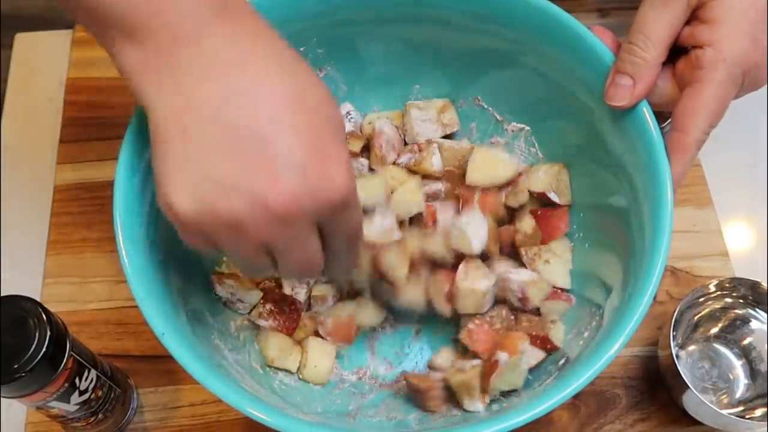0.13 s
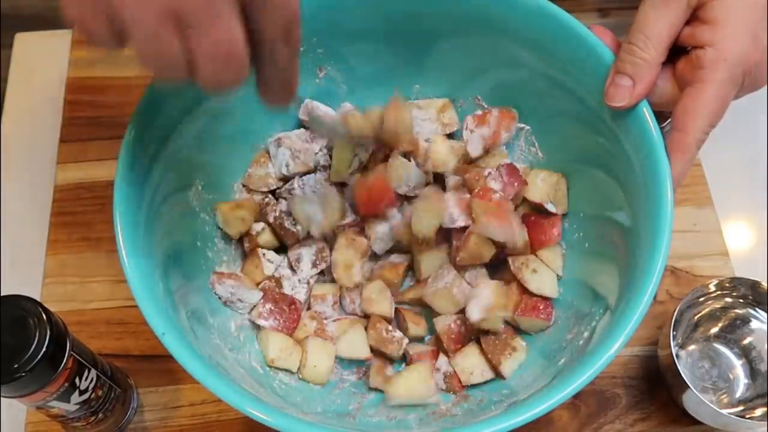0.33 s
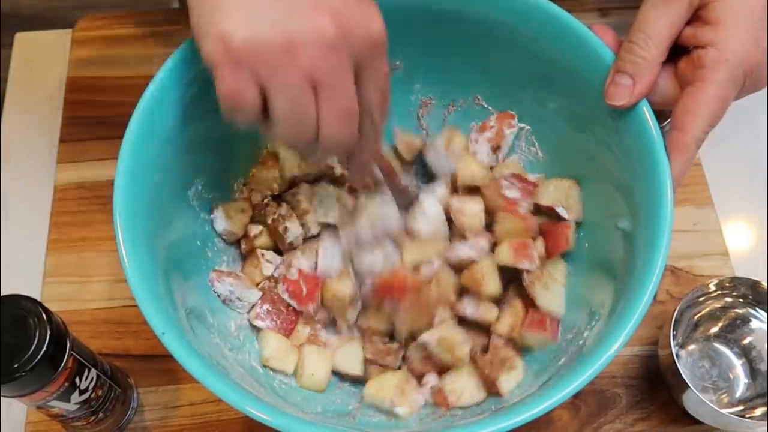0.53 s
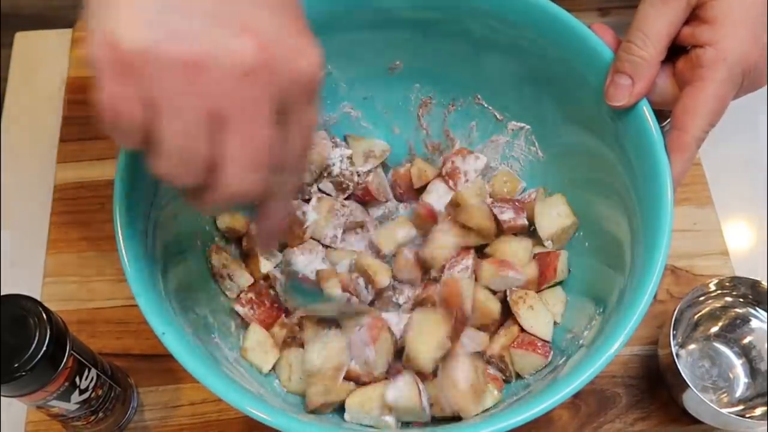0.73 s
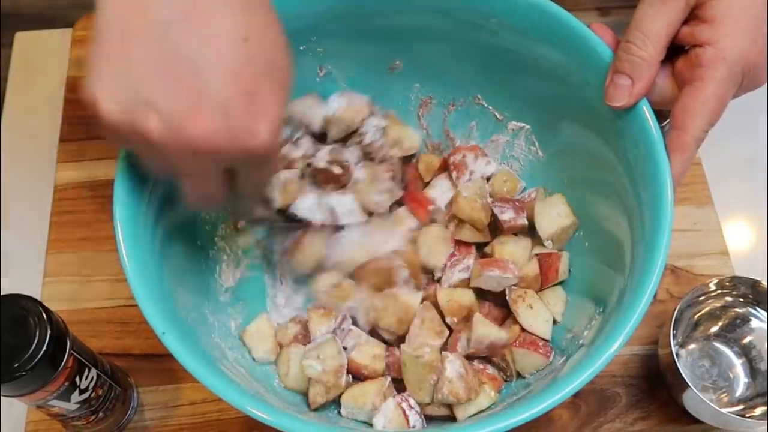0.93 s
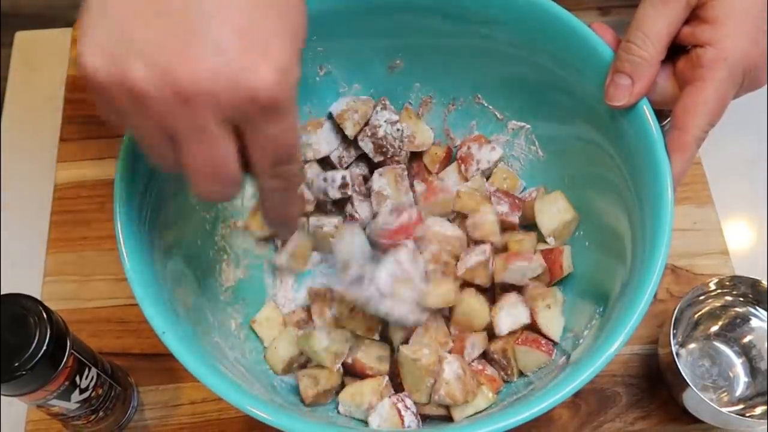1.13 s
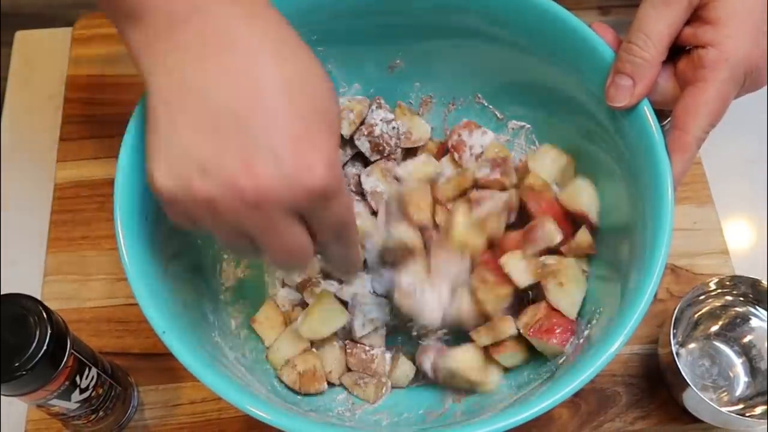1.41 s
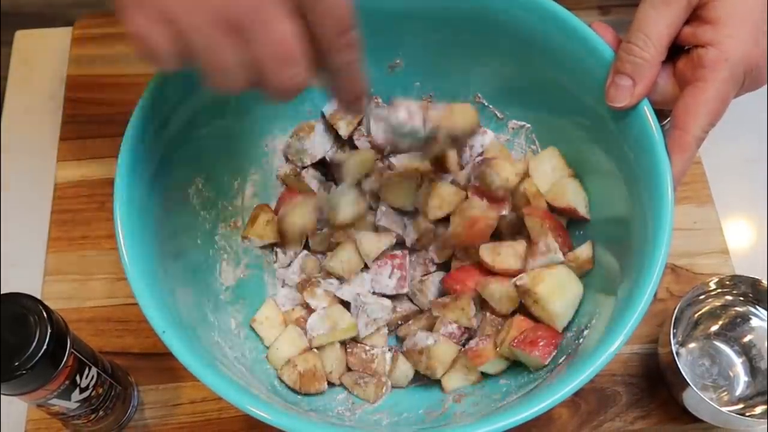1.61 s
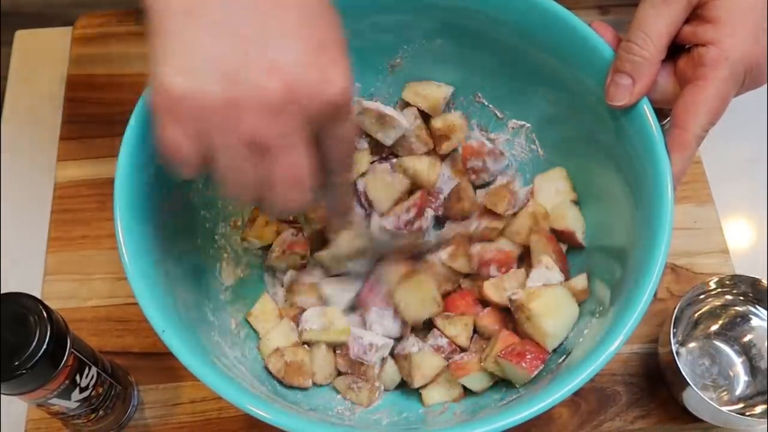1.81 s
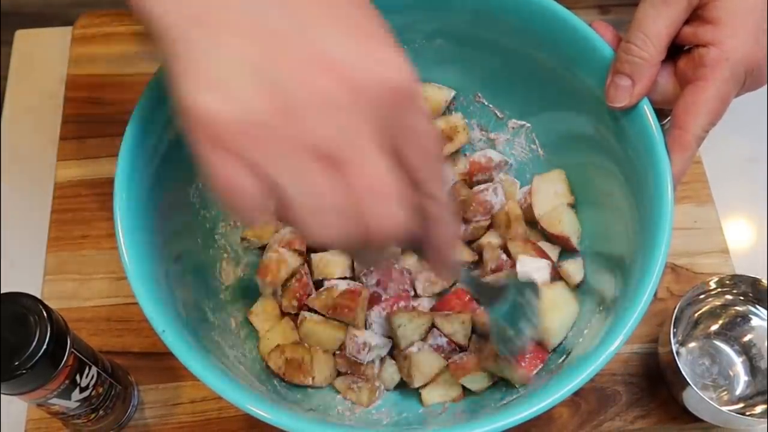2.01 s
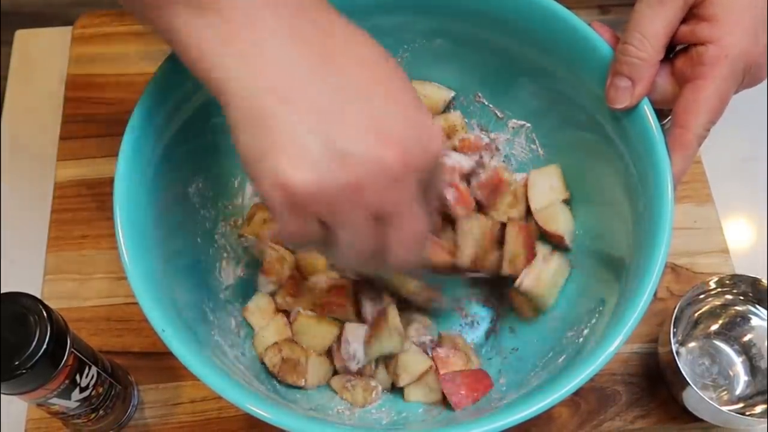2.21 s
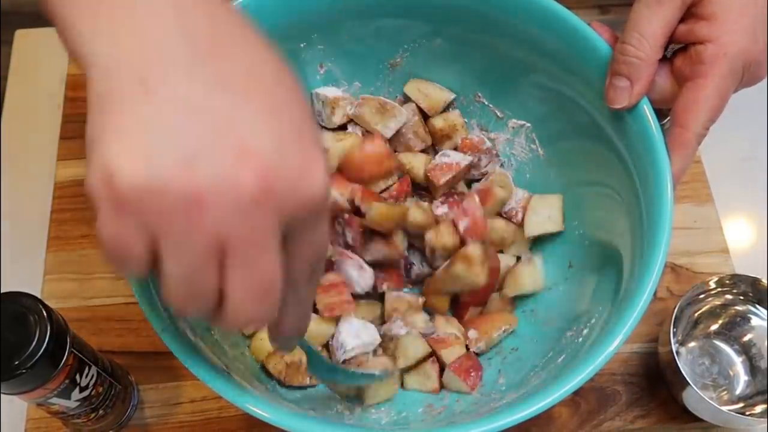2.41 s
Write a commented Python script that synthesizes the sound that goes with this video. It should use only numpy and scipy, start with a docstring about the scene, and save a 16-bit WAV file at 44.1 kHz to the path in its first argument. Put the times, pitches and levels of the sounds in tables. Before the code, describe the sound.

A spoon turns fruit chunks in a thick bowl, with sudden loud clacks and gritty scrapes

```python
"""In a hard kitchen, a metal spoon turns chopped fruit in a thick mixing bowl on a wooden counter.
Knocks ring the bowl's short modes behind a crack of noise; dropping fruit gives dull, swelling sine thuds.
The spoon edge drags through wet fruit: dense random clicks and hiss, partly ringing the bowl.
The room adds one clear echo and a noise tail over a quiet hum; whatever passes full scale is clipped."""
import sys
import numpy as np
from scipy import signal
from scipy.fft import rfft, irfft
from scipy.io import wavfile
from scipy.ndimage import uniform_filter1d

SR = 44100
rng = np.random.default_rng(int(sys.argv[2]) if len(sys.argv) > 2 else 0)


def dump_mix(stems):
    """Bounce the given channels to the path in sys.argv[1] as a 16-bit WAV at rate SR."""
    frames = np.atleast_2d(stems).T  # one column per channel
    limited = np.clip(frames, -1, 1)  # hard clip at full scale
    pcm = np.round(limited * 32767).astype(np.int16)
    wavfile.write(sys.argv[1], SR, pcm)


def volts(x):
    """Linear amplitude factor 10**(x/20) for a level x in dB, scalar or array-like."""
    e = np.asarray(x, float) / 20
    return 10 ** e


N = 112454  # length [samples]

# Ways the bowl rings: (pitch [Hz], relative level [dB], time to fall 60 dB when not held [s])
BOWL_MODES = [(491, -2, 0.019), (1040, 4, 0.013), (1300, -3.5, 0.02), (1790, -11.5, 0.067),
              (2235, -24.5, 0.079), (2591, -7.5, 0.03), (2934, -6.5, 0.029), (3290, -10, 0.056),
              (3660, -6, 0.055), (4017, 0.5, 0.011), (4155, -7, 0.021), (4562, -10.5, 0.031),
              (5630, -16, 0.018)]
# Spoon knocks: (time [s], level [dB], higher favoured pitch [Hz], lower favoured pitch [Hz],
# change of modes under SPLIT_HZ [dB], change of modes over UPPER_HZ [dB], crack against ring [dB])
KNOCKS = [(0.1279, -30, 3290, 1270, -5.5, -2, -16), (0.2118, 3, 3290, 2846, -6.5, -8, -33),
          (0.5518, -32, 3660, 1040, 1, -7, -23), (0.5716, -11.5, 1018, 530, -9.5, 3, -21),
          (1.055, -3.5, 2602, 1804, -5.5, -0.5, -19.5), (1.506, -31.5, 3465, 1430, -1, 7.5, -21.5),
          (1.759, -44, 2540, 515, -3.5, -11, -14), (1.9172, -41.5, 3340, 1790, -0.5, -7, -16),
          (2.066, -45, 1640, 1630, 2, -7, -43), (2.2106, -15, 2750, 1050, -16, 0.5, -0.5),
          (2.2275, -22, 2680, 4110, -17, -1.5, -16), (2.2912, -5.5, 2552, 509, -7, -7, -34)]
# Tone of the knock's crack and of the bright part of the drag: (frequency [Hz], gain [dB])
CRACK_TONE = [(2800, -26.5), (4500, 14), (7500, -1), (11000, -17), (16000, -32)]
# Dropping fruit pieces: (time [s], level before the bass cut [dB], pitch [Hz])
THUDS = [(0.054, -23.5, 562), (0.2595, -23, 956), (0.407, -21.5, 762), (0.86, -14.5, 784),
         (1.008, -32.5, 505), (1.081, -22, 830), (1.113, -32.5, 610), (1.302, -29, 640), (1.314, -27, 794),
         (1.378, -32, 541), (1.726, -30, 512), (1.836, -29.5, 532), (1.9165, -26.5, 586),
         (1.9335, -26.5, 540), (1.967, -33, 785), (2.172, -33.5, 554), (2.4655, -25.5, 562),
         (2.489, -30.5, 573)]
# Spoon dragging, joined by straight lines: (time [s], scrape level [dB], tumbling fruit level [dB])
DRAG = [(0, -51.5, -46.5), (.11, -53.5, -55), (.13, -44, -49.5), (.2, -48, -59), (.54, -66.5, -59.5),
        (.62, -48, -65), (.85, -57.5, -55.5), (1.03, -51.5, -55.5), (1.39, -58.5, -75), (1.42, -52.5, -58),
        (1.55, -49.5, -58.5), (1.68, -62, -57.5), (1.8, -66.5, -51), (1.84, -48, -46), (1.97, -50, -51.5),
        (2.155, -93, -58), (2.17, -47, -46), (2.208, -51.5, -45.5), (2.235, -37, -49),
        (2.285, -44.5, -51.5), (2.55, -53.5, -51)]
# Tone of the scrape: (frequency [Hz], relative level per Hz [dB])
SCRAPE_TONE = [(88, -33), (150, -4.5), (534, -6.5), (854, -13.5), (2100, -7.5), (2600, -3.5), (10200, -37),
               (12700, -33.5), (16000, -64.5)]
# Tone of the quiet kitchen: (frequency [Hz], relative level per Hz [dB])
HUSH_TONE = [(15, -46), (25, -13), (503, -8.5), (1260, -15), (2760, -17), (9320, -37.5), (12500, -41.5),
             (16000, -55.5)]
# Kitchen tail by band: (centre [Hz], time to fall 60 dB [s], level [dB], side against mid [dB])
ROOM_BANDS = [(244.8, 0.96, -16, -19.5), (465, 0.35, -6, -25), (1080, 0.24, -8.5, -24),
              (1914, 0.44, -13.5, -13.5), (5330, 0.54, -16, -8), (7400, 0.24, -9, 11)]
# Clear echo of a near wall: (delay [s], level [dB])
ECHOES = [(0.0158, -18)]
# A narrow band that lingers after every sound in the bowl:
# (low edge [Hz], high edge [Hz], time to fall 60 dB [s], level [dB], side against mid [dB])
LINGER = (2640, 2831.5, 0.42, -11.5, -11.5)

SPLIT_HZ, UPPER_HZ = 2000, 3850  # low modes lie under the first, upper modes over the second
FAVOUR_DB, SCATTER_DB = 9.5, 1.2  # boost of a favoured mode, random spread of every mode
CRACK_S, GRIP_S = 0.0048, 0.0072  # fading of the crack, choking of the ring
RISE_S, SOFTEN = 0.00034, 0.27  # knock rise at a crack of 0 dB, how much a weaker crack slows it
RADIATE_HZ = 214  # the bowl gives little below this
THUD_CYCLES, THUD_RISE = 1.32, 0.36  # fading and swelling of a thud [cycles]
TUMBLE_PER_S, TUMBLE_SPREAD_DB, TUMBLE_HZ = 130, 2.5, 435.4  # rate, size spread, middle pitch
RUMBLE_HZ, RUMBLE_DB = 215, -4.5  # top edge, level against the tumbling
GRIT_PER_S, GRIT_SPREAD_DB = 440, 1.5  # average rate and size spread of the slips
WET_HISS, SCRAPE_RING_DB = 0.6, -5.5  # hiss strength (plain number), ringing against the scrape
BRIGHT_DB, BRIGHT_PER_DB = -13, 1.34  # bright share at a scrape of -47.5 dB, its growth [dB per dB]
HUSH_DB, HUM_HZ, HUM_DB = -59.5, 120, -71.5
ROOM_ONSET_S, PORT_LAG_S = 0.012, 3e-6  # swelling of the tail, time shift of each channel
CEILING, TOP_HZ = 1.0, 16200  # clipping point (1 = full scale), top of the treble


def table(rows):
    """Columns of a table."""
    return np.array(rows, float).T


def level(x, db):
    """Set the rms level."""
    return x * volts(db) / np.sqrt(np.mean(x ** 2))


def colour(x, points):
    """Filter by (frequency [Hz], gain [dB]) points on a log-frequency axis."""
    hz, db = table(points)
    f = np.fft.rfftfreq(x.shape[-1], 1 / SR) + 1
    gain = volts(np.interp(np.log(f), np.log(hz), db))
    return irfft(rfft(x) * gain, x.shape[-1])


def add(out, s, x):
    """Mix x into out from time s."""
    i = int(s * SR)
    out[i:i + len(x)] += x[:len(out) - i]


def sizes(count, spread_db):
    """Many small, few large, either sign."""
    size_db = spread_db * np.minimum(rng.exponential(size=count), 3)
    return volts(size_db) * rng.choice([-1, 1], count)


def hush():
    """The quiet kitchen: dull noise and a mains hum."""
    mid, side = colour(rng.standard_normal((2, N)), HUSH_TONE)
    side = side * volts(-8.0)
    noise = level(np.array([mid + side, mid - side]), HUSH_DB)
    hum = np.sqrt(2) * volts(HUM_DB) * np.sin(2 * np.pi * HUM_HZ * np.arange(N) / SR)
    return noise + hum


def kitchen(x):
    """One clear echo and a diffuse tail that dies by band; left and right differ a little."""
    t = np.arange(SR) / SR
    tail = np.zeros((2, SR))  # mid, side
    bands = [(hz / 1.298, min(hz * 1.378, SR / 2.2), *rest) for hz, *rest in ROOM_BANDS] + [LINGER]
    for low_hz, high_hz, t60, db, side_db in bands:
        sos = signal.butter(2, [low_hz, high_hz], "band", fs=SR, output="sos")
        noise = signal.sosfilt(sos, rng.standard_normal((2, SR)))
        band = noise * np.exp(-np.log(1000) * t / t60)
        even = np.sqrt(2 * np.log(1000) / t60 / SR)  # makes up for long and short decays
        tail += band * volts(np.array([[db], [db + side_db]])) * even
    tail *= 1 - np.exp(-(t / ROOM_ONSET_S) ** 2)
    for late, db in ECHOES:
        dulled = signal.firwin(numtaps=9, cutoff=5000, fs=SR)  # dulled by the bounce
        add(tail[0], late, volts(db) * dulled)
    tail[0, 0] = 1  # the direct sound
    mid, side = signal.fftconvolve(x[None], tail)[:, :N]
    side = side + np.gradient(x) * PORT_LAG_S * SR  # the bowl is a touch nearer one port
    return np.array([mid + side, mid - side])


def thin(x):
    """A bowl this size radiates little bass."""
    return signal.sosfilt(signal.butter(2, RADIATE_HZ, "high", fs=SR, output="sos"), x)


def thud(hz):
    """A soft blow: a few cycles that swell and die, peak near 1."""
    cycles = np.arange(SR // 30) / SR * hz
    swell = 1 - np.exp(-(cycles / THUD_RISE) ** 2)
    shape = swell * np.exp(-cycles / THUD_CYCLES)
    return shape / shape.max() * np.sin(2 * np.pi * cycles)


def fruit():
    """Dropping pieces thud; small ones tumble and the bowl rumbles on the counter, as DRAG sets."""
    out, small = np.zeros((2, N))
    for s, db, pitch_hz in THUDS:
        add(out, s, volts(db) * thud(pitch_hz))
    count = int(TUMBLE_PER_S * N / SR)
    times = rng.random(count) * N / SR
    pitches = TUMBLE_HZ * 2 ** (0.52 * rng.standard_normal(count))  # spread in octaves
    for s, hz, size in zip(times, pitches, sizes(count, TUMBLE_SPREAD_DB)):
        add(small, s, size * thud(hz))
    low_band = signal.butter(2, [60, RUMBLE_HZ], "band", fs=SR, output="sos")
    rumble = signal.sosfilt(low_band, rng.standard_normal(N))
    s, _, db = table(DRAG)
    tumble_gain = volts(np.interp(np.arange(N) / SR, s, db))
    return thin(out) + (level(small, 0) + level(rumble, RUMBLE_DB)) * tumble_gain


def ring(hz, db, phase):
    """The bowl's answer to a tap: fading sines with these mode pitches and levels."""
    t60 = table(BOWL_MODES)[2]
    t = np.arange(SR // 10)[:, None] / SR
    fade = np.exp(-np.log(1000) * t / t60)
    return (volts(db) * fade * np.sin(2 * np.pi * hz * t + phase)).sum(axis=1)


def scrape():
    """Dense tiny slips of the spoon edge, in uneven bursts, partly ringing the bowl."""
    grit = (rng.random(N) < GRIT_PER_S / SR) * sizes(N, GRIT_SPREAD_DB)
    slips = grit + WET_HISS * rng.standard_normal(N)
    hz, base_db, _ = table(BOWL_MODES)
    rung = signal.fftconvolve(slips, ring(hz, base_db - 6 * (hz < SPLIT_HZ), 0))[:N]
    s, db, _ = table(DRAG)
    db = np.interp(np.arange(N) / SR, s, db)
    # a harder drag is brighter
    bright = level(colour(slips, CRACK_TONE), BRIGHT_DB) * volts(BRIGHT_PER_DB * (db + 47.5))
    steps = np.repeat(rng.standard_normal(N // 200 + 1), 200)[:N]
    stutter = volts(3.2 * uniform_filter1d(steps, size=400))
    body = level(colour(slips, SCRAPE_TONE), 0) + level(rung, SCRAPE_RING_DB) + bright
    return body * level(stutter, 0) * volts(db)


def knocks():
    """Each spot favours two modes, bent by the fruit's load; hand and fruit choke the ring; a crack leads."""
    out = np.zeros(N)
    hz, base_db, _ = table(BOWL_MODES)
    t = np.arange(SR // 10) / SR

    def nearest(spot_hz):
        """Marks the mode closest in pitch."""
        return np.arange(len(hz)) == np.argmin(np.abs(np.log(hz / spot_hz)))

    for s, db, high_hz, low_hz, low_db, upper_db, crack_db in KNOCKS:
        chance = rng.standard_normal((2, len(hz)))
        gain_db = base_db + SCATTER_DB * chance[0]
        gain_db = gain_db + FAVOUR_DB * nearest(high_hz) + FAVOUR_DB * nearest(low_hz)
        gain_db = gain_db + upper_db * (hz > UPPER_HZ) + low_db * (hz < SPLIT_HZ)
        bent_hz = np.where(nearest(high_hz), high_hz, np.where(nearest(low_hz), low_hz, hz))
        rung = ring(bent_hz, gain_db, 1.14 * chance[1]) * np.exp(-(t / GRIP_S) ** 2)
        rung = rung / np.sqrt(np.mean(rung[:SR // 250] ** 2))  # even loudness over the first 4 ms
        noise = level(colour(rng.standard_normal(len(t)), CRACK_TONE), crack_db)
        crack = noise * np.exp(-t / CRACK_S)
        rise_s = RISE_S * volts(-SOFTEN * crack_db)  # duller contacts push longer
        rise = np.sin(np.pi / 2 * np.minimum(t / rise_s, 1)) ** 2
        add(out, s, volts(db) * (rung + crack) * rise)
    return thin(out)


def scene():
    """All that happens in the bowl, in the room, over the hush."""
    return kitchen(knocks() + fruit() + scrape()) + hush()


def band_limit(x):
    """A steep low-pass at the top of the band."""
    return signal.sosfilt(signal.butter(12, 16250, fs=SR, output="sos"), x)


def record(dry):
    """The input clips at full scale and the top is cut."""
    clipped = np.clip(dry, -CEILING, CEILING)
    treble_cut = signal.ellip(8, 0.2, 60, TOP_HZ, fs=SR, output="sos")
    mix = signal.sosfilt(treble_cut, clipped)
    return band_limit(mix)


dry = scene()
out = record(dry)
dump_mix(out)
```